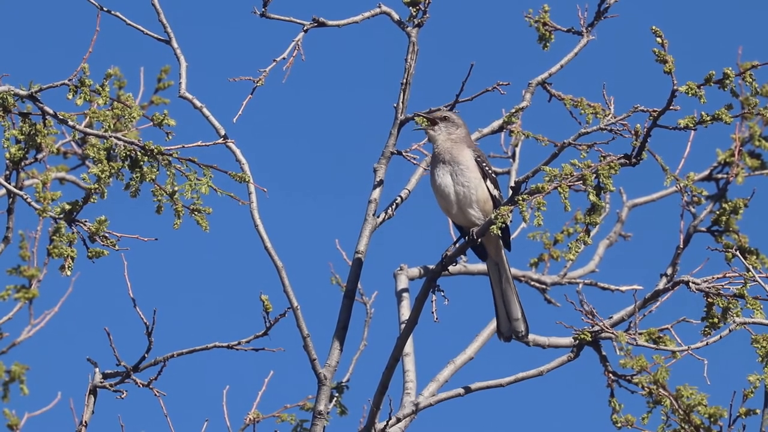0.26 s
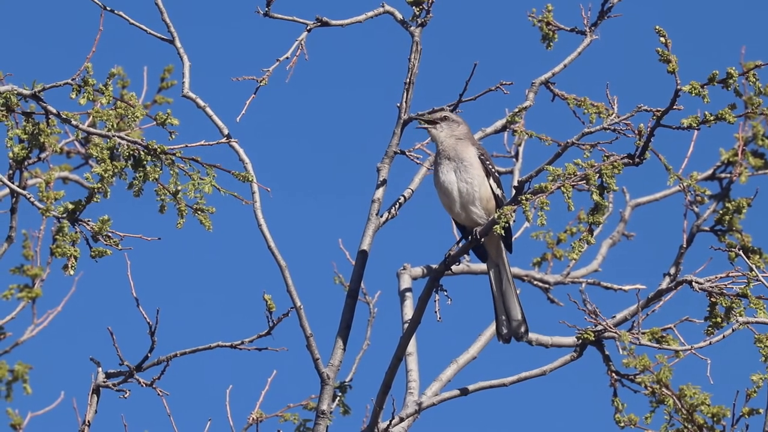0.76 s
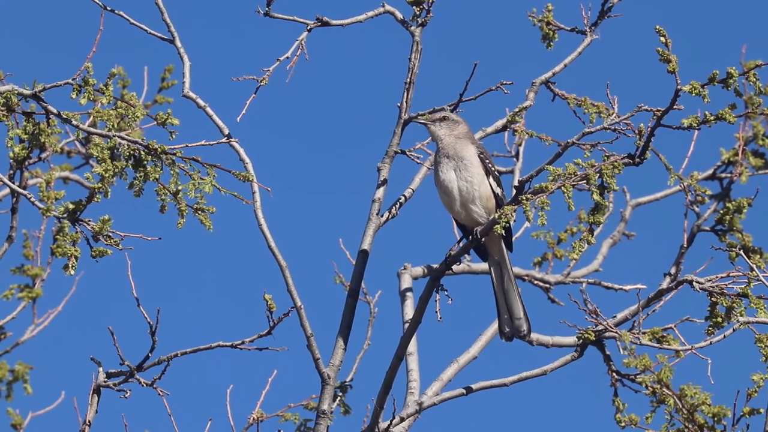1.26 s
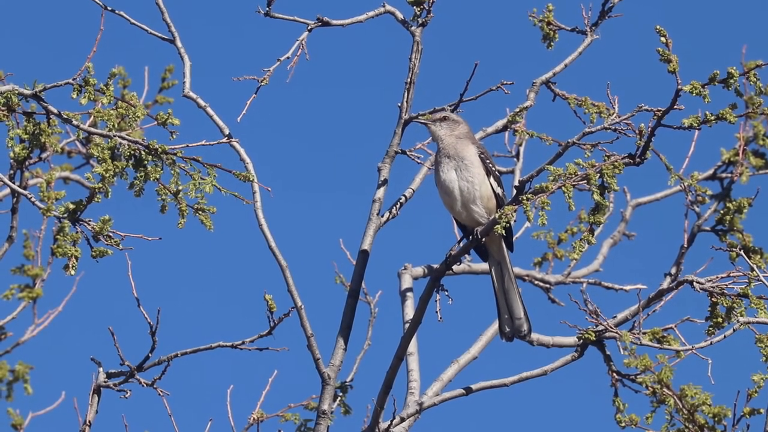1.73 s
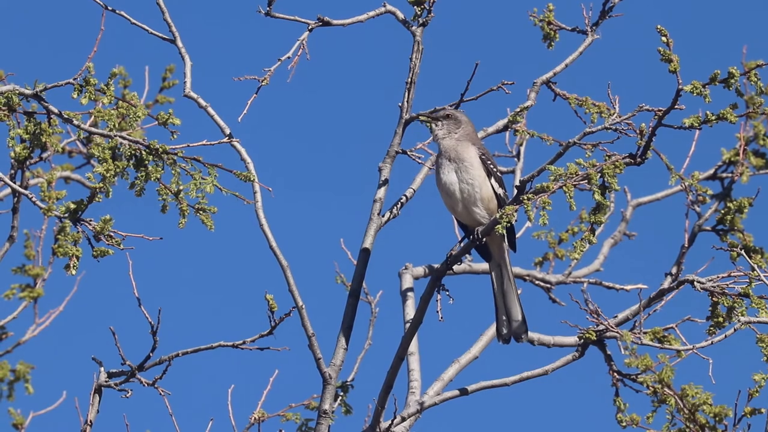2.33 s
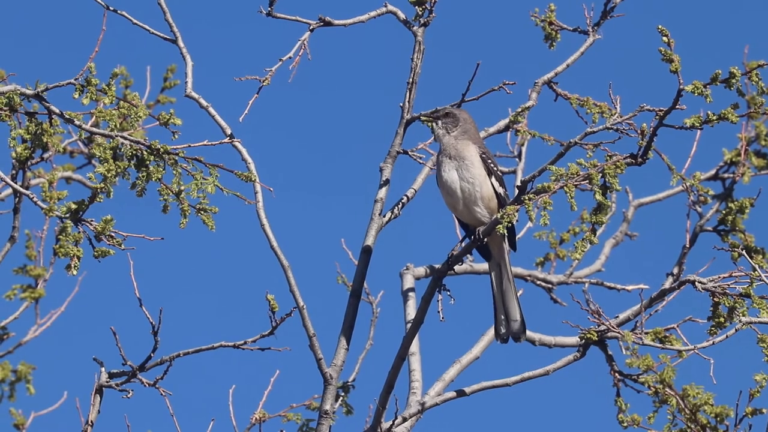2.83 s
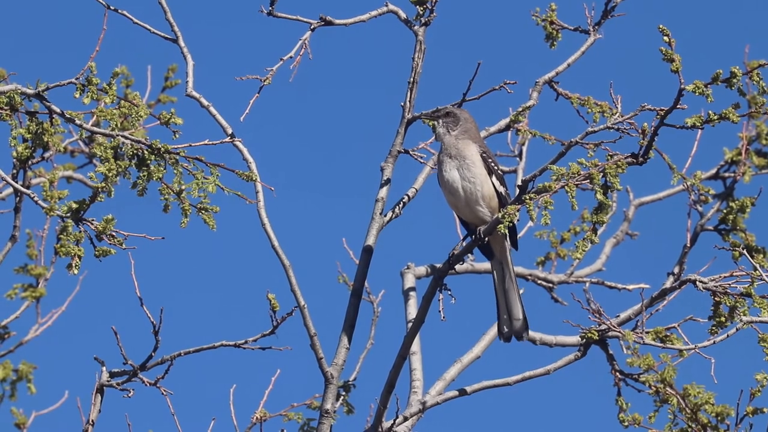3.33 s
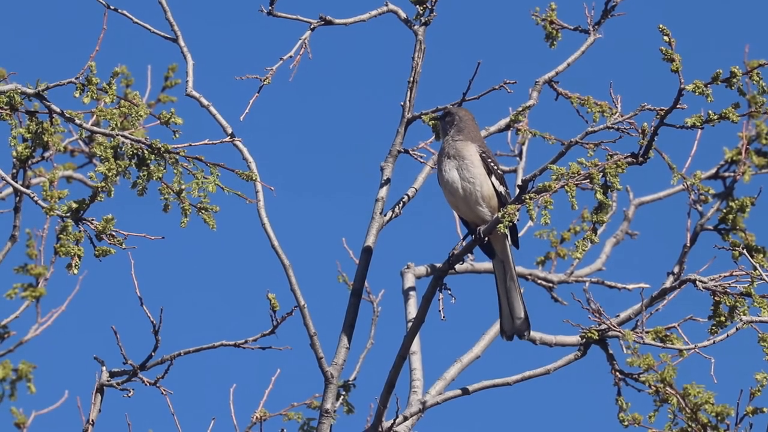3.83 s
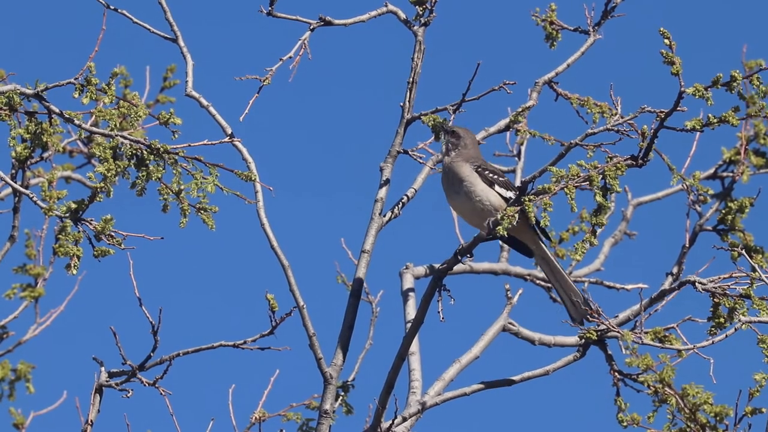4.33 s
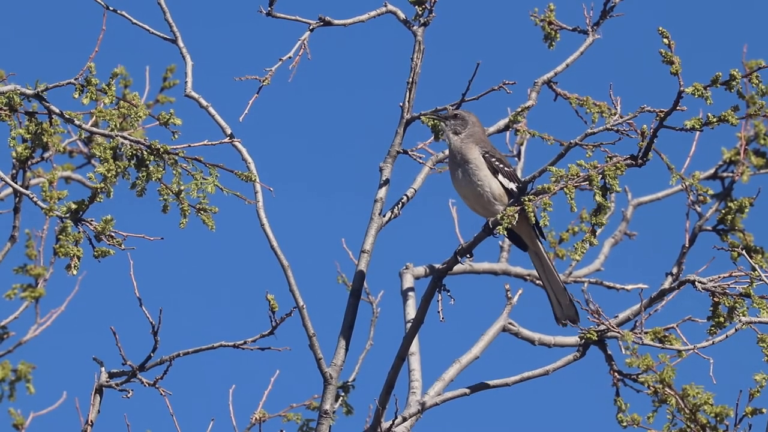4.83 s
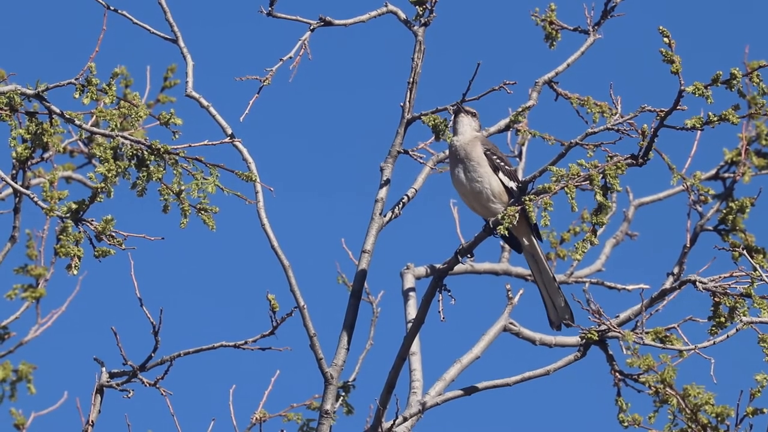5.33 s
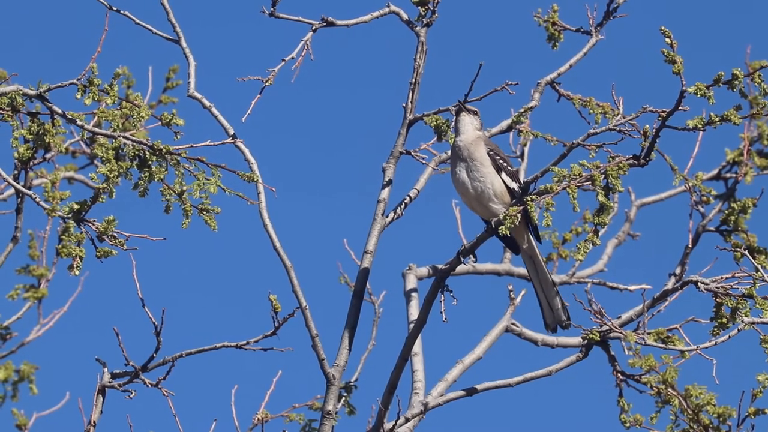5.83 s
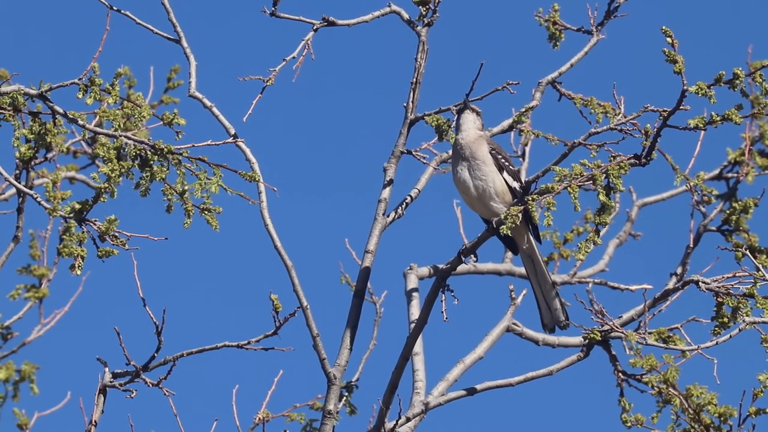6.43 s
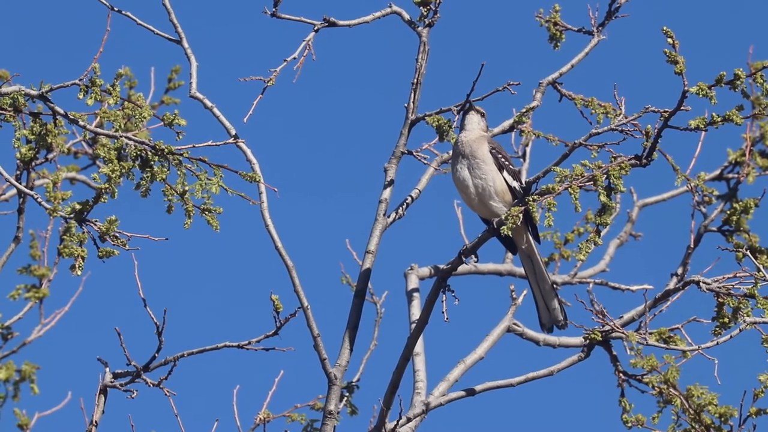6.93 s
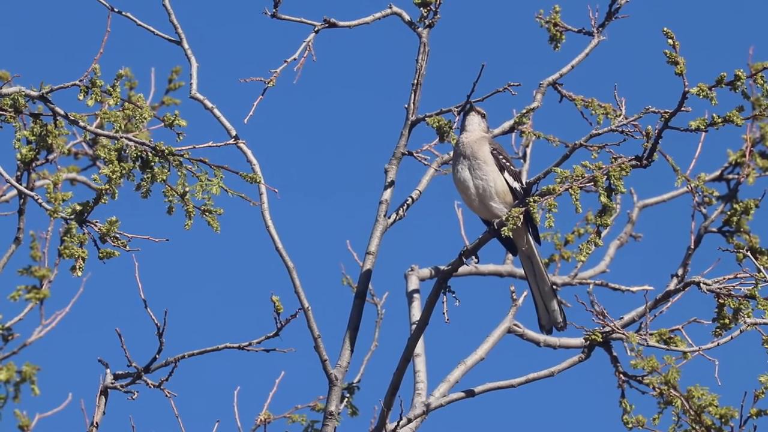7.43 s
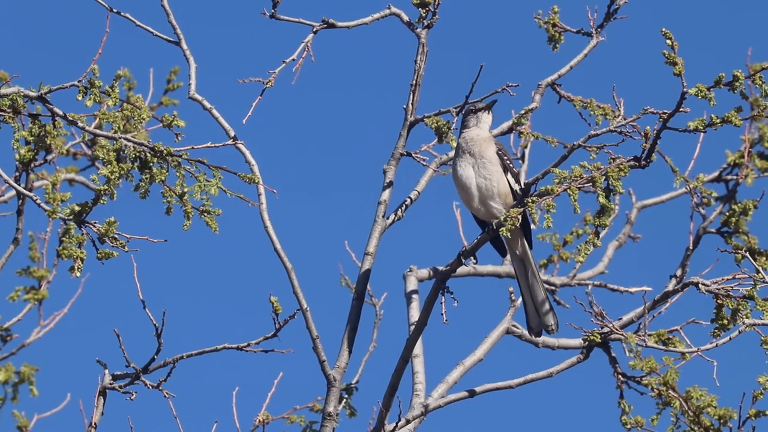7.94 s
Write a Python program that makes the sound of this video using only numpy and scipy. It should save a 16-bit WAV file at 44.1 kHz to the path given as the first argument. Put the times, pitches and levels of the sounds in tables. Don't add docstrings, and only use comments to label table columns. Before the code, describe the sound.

A mockingbird sings from a bare treetop in open country. A low rasp and quick leaping chirps come first, then a pause, plunging whistles and groups of snapping notes, a run of rising slides, a croak into two fast trills, another pause, then whistle and buzz pairs. Faint rocky echo, distant birds and hum. Song is in the left channel only; the right holds only hiss.

```python
import sys
import numpy as np
from scipy import signal
from scipy.fft import rfft, irfft
from scipy.io import wavfile
from scipy.ndimage import uniform_filter1d

SR = 44100
rng = np.random.default_rng(int(sys.argv[2]) if len(sys.argv) > 2 else 0)


def gain_from_db(level_db):
    decades = np.asarray(level_db, float) / 20
    return 10 ** decades


def master(y):
    cut = np.clip(np.atleast_2d(y).T, -1, 1)
    pcm = np.round(cut * 32767)
    wavfile.write(sys.argv[1], SR, pcm.astype(np.int16))


N = 360738

# [t/s, f/Hz, level/dB]
WHISTLES = [
    [(2.026, 2300, -51), (2.033, 2850, -35), (2.039, 3210, -26.5), (2.044, 3170, -28.5), (2.047, 3200, -40)],
    [(5.971, 2216, -42), (5.987, 2156, -26.5), (5.997, 2134, -23), (6.013, 2174, -23), (6.022, 2123, -28),
     (6.03, 2155, -49), (6.048, 2170, -52)],
    [(6.241, 2295, -45), (6.254, 2350, -29.5), (6.27, 2120, -26), (6.284, 2053, -24.5),
     (6.2875, 2124, -24.5), (6.29, 2380, -38), (6.294, 2180, -39), (6.297, 1850, -52)],
    [(7.67, 2660, -46), (7.682, 2294, -27.5), (7.692, 1470, -46.5)],
    [(7.699, 2183, -37), (7.712, 2563, -29), (7.733, 2817, -28.5), (7.77, 3020, -27.5), (7.792, 2035, -26),
     (7.818, 2263, -32.5), (7.85, 2275, -33.5), (7.908, 2260, -34), (7.937, 2440, -49)],
    [(8.142, 2190, -53), (8.154, 2155, -34), (8.166, 1900, -31.5), (8.18, 1950, -34)],
]
# [t/s, f/Hz, level/dB]
DIPS = [
    [(2.0555, 4050, -44), (2.058, 3370, -27), (2.0605, 3060, -23.5), (2.066, 2690, -32),
     (2.075, 2610, -30.5), (2.085, 2750, -34), (2.096, 2870, -29.5), (2.129, 3036, -29), (2.138, 3000, -44)],
    [(2.1455, 3830, -42), (2.148, 3150, -25.5), (2.155, 2970, -24.5), (2.159, 2770, -29),
     (2.168, 2630, -32.5), (2.187, 2580, -37), (2.201, 3020, -28.5), (2.211, 2985, -33), (2.218, 2870, -46)],
    [(2.223, 4250, -49), (2.226, 3630, -28), (2.23, 3030, -21.5), (2.235, 2800, -31), (2.242, 2670, -34),
     (2.252, 2553, -34), (2.271, 2525, -39), (2.277, 2410, -42), (2.293, 2280, -51)],
]
# [share of length, share of pitch span, level under top/dB]
HOOK = [(0, 0, -7.5), (.22, 0.4, -1), (.56, 0.87, -2.5), (.8, 0.79, -9), (1, 0.51, -6)]
ARCH = [(0, 0, -10), (.2, 0.415, -1.5), (.47, 0.932, 5.5), (.72, 0.766, 3), (1, 0.082, -6)]
LEAP = [(0, 0.22, -24), (.1, 0, -16.5), (.38, 0.4, -12), (.6, 0.72, -1), (.76, .78, -2), (.9, 0.92, -4),
        (1, 1, -13)]
LOOP = [(0, .86, -19), (.07, 0.66, -5.5), (.15, .55, 1.5), (.25, .3, -1.5), (.4, .02, -14), (.74, .08, -15),
        (.82, .434, 1), (.87, 1, -20), (.91, 0.64, -2), (1, 0.16, -16)]
PLUNGE = [(.03, 1, -18), (.1, .56, -4), (.16, 0.45, 0.5), (.25, .26, -3), (.36, .08, -13),
          (.5, 0.032, -12.5), (.74, .08, -14.5), (.82, 0.436, 0.5), (.87, 1, -20), (.91, 0.56, -5),
          (1, 0.23, -18)]
CLIMB = [(0, .03, -19), (.18, 0.49, -9.5), (.3, .69, -0.5), (.55, .8, 0.5), (.635, .86, -9),
         (.68, .9, -3.5), (.73, .94, -12.5), (.8, .97, -1.5), (1, 1, -27)]
# [start t/s, length/s, low f/Hz, high f/Hz, top level/dB]
ARCHES = [
    (0.176, 0.032, 1493, 2207, -34),
    (0.219, 0.034, 1384, 1857, -35.5),
]
LEAPS = [
    (0.339, .033, 1530, 4020, -29),
    (.627, 0.032, 1366, 4190, -26),
]
LOOPS = [
    (.373, .069, 2230, 4750, -24.5),
    (.658, .071, 2300, 4800, -23.5),
]
CLIMBS = [
    (.47, 0.069, 1470, 4415, -26.5),
    (0.766, 0.058, 1470, 4353, -25.5),
]
HUMPS = [
    (3.867, 0.038, 1504, 1980, -42.5),
    (3.906, 0.03, 1530, 2010, -40.5),
    (3.947, 0.03, 1485, 1923, -42.5),
]
# [start t/s, snap t/s, start f/Hz, held f/Hz, top level/dB]
FLICKS = [(2.364, 2.391, 986, 1325, -34.5), (2.413, 2.443, 1308, 1345, -29.5),
          (2.465, 2.501, 1292, 1339, -30.5), (2.522, 2.56, 1275, 1330, -31.5),
          (2.583, 2.623, 1165, 1254, -34), (2.858, 2.882, 960, 1290, -40),
          (2.904, 2.936, 1270, 1340, -34.5), (2.961, 2.994, 1260, 1376, -35.5),
          (3.022, 3.061, 1244, 1437, -38), (3.387, 3.41, 1160, 1425, -45),
          (3.432, 3.463, 1270, 1380, -40.5), (3.486, 3.523, 1228, 1396, -38.5),
          (3.555, 3.59, 1234, 1333, -38)]
# [start t/s, end t/s, knee f/Hz, top f/Hz, top level/dB]
RISES = [
    (4.066, 4.118, 2460, 2970, -28.5),
    (4.138, 4.197, 2425, 2975, -27.5),
    (4.218, 4.288, 2330, 2920, -27),
    (4.32, 4.384, 2296, 2780, -27.5),
    (4.414, 4.482, 2343, 2800, -29),
    (4.57, 4.627, 2237, 2554, -27),
    (4.646, 4.71, 2220, 2725, -27.5),
    (4.74, 4.798, 2274, 2920, -28),
]
# [t/s, f/Hz, level/dB]
TRILL_ENDS = [
    [(5.032, 2340, -34), (5.038, 2510, -39), (5.049, 2600, -52), (5.055, 2650, -36.5), (5.073, 2714, -30.5),
     (5.077, 2620, -41), (5.086, 2970, -30), (5.103, 2620, -31), (5.1055, 2450, -42)],
    [(5.114, 3250, -48), (5.119, 2980, -33), (5.129, 2870, -32.5), (5.131, 2200, -43), (5.138, 1970, -45)],
    [(5.512, 2180, -41), (5.517, 2680, -45), (5.5205, 2740, -31.5), (5.5295, 2685, -32.5),
     (5.5315, 2200, -41)],
    [(5.826, 2000, -33), (5.83, 2530, -33), (5.837, 2360, -40), (5.846, 2410, -68)],
]
# [t from its start/s, f/Hz, level under top/dB]
CHIP = [(0, 2380, -5), (.0015, 2420, 3.5), (.0028, 2680, 3), (.0055, 2745, -0.5), (.0095, 2900, 0.5),
        (.012, 2530, -1.5), (.0131, 2380, 0), (.0152, 1946, 4), (.0175, 1750, -9)]
# [t/s, peak level/dB, factor on pitch, extra crest f/Hz, falling stroke level/dB]
CHIPS = [(5.1433, -33.5, 1.106, 0, -2), (5.169, -34.5, 1.03, 148, -2.5), (5.1946, -33, 1.01, 64, -13),
         (5.22, -33, 1.007, 30, -7.5), (5.247, -32, 0.95, 94, -24), (5.5463, -31, 1.03, 66, -14),
         (5.5732, -31, 1.017, 32, -18), (5.6, -31, 1.007, 330, -8.5), (5.6289, -31, 1.016, 90, -8.5),
         (5.6569, -31.5, 1, 57, -10), (5.687, -32.5, .99, 40, -7.5), (5.7135, -31.5, 1, 18, -8),
         (5.744, -32, 1.013, 77, -6.5), (5.774, -32, 1, 55, -7.5), (5.8019, -33, 1.02, 40, -9.5)]
# [start t/s, end t/s, start f/Hz, end f/Hz, level/dB]
FAINT = [
    (1.96, 2.033, 2530, 2480, -62),
    (4.018, 4.08, 3200, 2810, -62.5),
    (4.058, 4.112, 3000, 4740, -66),
    (7.687, 7.698, 3980, 2450, -47),
    (8.168, 8.221, 2630, 2770, -37),
]
# [t/s, f/Hz, level/dB, pitch swing 0-1, level swing 0-1]
RASP = [(.024, 2030, -51, 0.31, 0.4), (.031, 2042, -39, 0.35, 0.14), (.06, 2105, -40.5, 0.22, 0),
        (.11, 2048, -42, 0.25, 0.1), (.124, 1920, -51, 0.23, .3)]
# [t/s, f/Hz, level/dB, pitch swing 0-1, level swing 0-1]
BUZZES = [
    [(6.032, 2936, -39, 0.028, .2), (6.048, 3020, -37.5, .035, .25), (6.066, 3097, -34.5, 0.028, 0.47),
     (6.09, 2970, -35, 0.066, .65), (6.12, 2870, -34.5, 0.085, .6), (6.142, 2810, -35.5, 0.084, .55),
     (6.155, 2770, -37.5, 0.13, .15), (6.18, 2780, -43, 0.11, .6), (6.212, 2790, -53, .085, 0.64)],
    [(6.297, 2850, -41, .05, .3), (6.303, 2950, -40, 0.044, .3), (6.316, 3037, -36, .03, .2),
     (6.327, 2984, -33.5, .012, .05), (6.34, 3100, -30.5, 0.033, .1), (6.376, 3100, -29.5, 0.041, .1),
     (6.382, 2940, -32.5, .06, 0.18), (6.399, 2720, -36, .06, .2), (6.407, 2320, -61, 0.093, .2)],
]
# [first f/Hz, last f/Hz, lopsidedness/radians, unevenness 0-1, pitch shake 0-1]
FLUTTERS = [
    (122, 134, .25, .04, .008),
    (226, 198, .2, .17, .014),
    (236, 200, .1, .12, .009),
]
# [t/s, pulse f/Hz, level/dB, low throat f/Hz, high throat level/dB]
CROAK = [(4.961, 189, -56, 1520, 26), (4.969, 189.2, -41.5, 1550, 20), (4.982, 235, -36.5, 1570, 13),
         (4.992, 301, -36, 1590, 14), (5.0, 267.7, -36.5, 1610, 2), (5.02, 280, -37.5, 1690, -10),
         (5.035, 296, -41, 1760, 1), (5.05, 314, -40.5, 1920, -16), (5.072, 357, -53, 2100, -22)]
# [start t/s, end t/s]
PAIRING_S = (4.99, 5.004)
# [delay t/s, level/dB]
BOUNCES = [
    (.0046, -17),
    (0.0101, -19.5),
    (0.027, -26),
]
# [t/s, extra scatter level/dB]
FACING = [
    (.3, 4),
    (1.5, -2.5),
    (2.3, 3),
    (3.6, 8),
    (4.4, 3.5),
    (5.1, 1.5),
    (8.1, -1),
]
# [start t/s, length/s, centre f/Hz, width f/Hz, level/dB]
FAR = [
    (1.43, .12, 3000, 250, -69),
    (1.89, .07, 3320, 60, -67),
    (6.85, 0.23, 3020, 220, -64.5),
    (7.05, .18, 3050, 300, -67),
    (7.18, .16, 2220, 40, -70),
    (7.57, .11, 3150, 120, -68),
]
# [f/Hz, width f/Hz, level/dB]
HUM = [
    (160, 2.3, -77.5),
    (342.4, 104, -76),
    (751, 35, -75),
]
# [t/s, level/dB]
WIND = [
    (0.0, -53.5),
    (0.59, -72),
    (6.168, -79),
    (6.31, -68),
    (6.649, -77),
    (8.07, -76),
    (8.18, -65),
]
# [f/Hz, level per Hz/dB]
HISS = [(16, -24), (46, 0), (71, -9), (190, -10), (755, -13), (1660, -14), (3200, -15.5), (13000, -16.5)]
# [f/Hz, level/dB]
LEFT_OVER_RIGHT = [(60, 4.5), (230, -1), (900, -0.5), (3490, -0.5), (13500, -1.5)]


def evened(x):
    return x / np.sqrt(np.mean(x ** 2) + 1e-20)


def read(points, hz):
    f, value = np.transpose(points)
    return np.interp(np.log(hz + 1), np.log(f + 1), value)


def unroll(rows):
    s, *columns = np.transpose(rows)
    t = np.arange(s[0], max(s[-1], s[0] + 0.004), 1 / SR)
    return [uniform_filter1d(np.interp(t, s, c), size=50) for c in columns]


def drift(shape, size):
    return evened(uniform_filter1d(rng.standard_normal(shape), size=size))


def add(mix, s, sound):
    edges = signal.windows.tukey(len(sound), min(130 / len(sound), 1))
    part = mix[round(s * SR):][:len(sound)]
    part += (sound * edges)[:len(part)]


def band(hz, width_hz):
    r = np.exp(-np.pi * width_hz / SR)
    noise = rng.standard_normal(N) + 1j * rng.standard_normal(N)
    slow = signal.lfilter([1 - r], [1, -r], noise)
    return evened((slow * np.exp(2j * np.pi * hz * np.arange(N) / SR)).real)


def syrinx(hz, overtones_db, throat_hz, width_hz, shut=0, held=1):
    k = np.arange(1, len(overtones_db) + 1)[:, None]
    off = (k * hz - throat_hz) / width_hz
    throat = 1 / (1 + off ** 2 + (np.maximum(off, 0) * shut) ** 4) ** 2
    beak = 0.015 / (1 + ((k * hz - 8200) / 1300) ** 2)
    share = gain_from_db(overtones_db)[:, None] * (0.0026 + throat + beak)
    power = uniform_filter1d((share ** 2).sum(0), size=held) / 2
    tremor = 1 + 0.024 * drift(len(hz), 60)
    wander = 1 + (0.001 + 0.003 * shut) * drift(len(hz) + 400, 400)[200:-200]
    turns = k * np.cumsum(hz * wander) / SR + rng.random(k.shape)
    return tremor * (share * np.cos(2 * np.pi * turns)).sum(0) / np.sqrt(power)


def trace(shape, start, length, low_hz, high_hz, db):
    return np.multiply(shape, [length, high_hz - low_hz, 1]) + [start, low_hz, db]


def flick(start, snap, start_hz, held_hz, db):
    climb_hz, climbs = held_hz - start_hz, held_hz > 1.15 * start_hz
    start_db = db - 6.5 - 32 * climb_hz / start_hz
    leap = (0.8 if climbs else 1) * np.clip((db + 49) / 8, 0.6, 1)
    hook, crest = (1, 0.62) if climbs else (1.03, 1.15)
    snap_db = db + 1.0 + 0.7 * (-32 - db)
    return [(start, hook * start_hz, start_db - 10),
            (start + 0.002, hook * start_hz, start_db),
            (start + 0.32 * (snap - start), start_hz + 0.27 * climbs * climb_hz, start_db + 0.5 * (db - start_db)),
            (snap - 0.011, start_hz + crest * climb_hz, db - 0.8),
            (snap - 0.003, 0.962 * held_hz, db),
            (snap, 1.14 * held_hz, db - 0.5),
            (snap + 0.0013, 1.236 * held_hz, db - 13.0),
            (snap + 0.00335, (1 + 0.61 * leap) * held_hz, snap_db),
            (snap + 0.006, (1 + 1.07 * leap) * held_hz, snap_db - 8),
            (snap + 0.0075, (1 + 1.25 * leap) * held_hz, db - 18)]


def rise(start, end, knee_hz, top_hz, db):
    from_hz, from_db = 1550, -22
    knee = end - 0.01163
    length, span_hz = knee - start, knee_hz - from_hz
    sag = min(0.03 + 0.8 * (start - RISES[0][0]), 0.27)
    return [(start, from_hz, db + from_db),
            (start + 0.287 * length, from_hz + sag * span_hz, db + 0.71 * from_db),
            (start + 0.72 * length, from_hz + 0.67 * span_hz, db - 3.5),
            (knee, knee_hz, db),
            (end - 0.004, top_hz - 70, db - 2.0),
            (end, top_hz, db - 11.5)]


def chip(s, db, up, crest_hz, fall_db):
    slow = 0.9 + 0.2 * (s - CHIPS[0][0])
    point = np.arange(len(CHIP))
    rows = np.multiply(CHIP, [slow, up, 1]) + [s - 0.001, 0, db]
    rows = rows + np.outer(point == 4, [0, crest_hz, -crest_hz / 80])
    return rows + np.outer(point >= 6, [0, 0, fall_db])


def faint(start, end, start_hz, end_hz, db):
    return [(start, start_hz, db - 23),
            (start + 0.18 * (end - start), start_hz + 0.31 * (end_hz - start_hz), db),
            (end, end_hz, db - 0.5)]


def whistles(bird):
    flicks = [flick(*row) for row in FLICKS]
    leaps = [trace(LEAP, *row) for row in LEAPS]
    climbs = [trace(CLIMB, *row) for row in CLIMBS]
    humps = [trace(ARCH, *row) for row in HUMPS]
    rises = [rise(*row) for row in RISES]
    chips = [chip(*row) for row in CHIPS]
    # (notes, overtone levels/dB, throat f/Hz, throat width f/Hz, beak shut 0-2)
    phrases = [([trace(HOOK, *ARCHES[0])], [6.5, 3.5, 0, 13, 10], 3600, 1800, 0),
               ([trace(ARCH, *ARCHES[1])], [0.5, 6.0, -15, 3, 11.0], 3600, 1800, 0),
               (leaps, [6.5, 11.5, 14, 0], 3100, 1600, 0),
               ([trace(LOOP, *LOOPS[0])], [5.0, 6.5, 10, -3, -8], 3100, 1600, 0),
               ([trace(PLUNGE, *LOOPS[1])], [2.7, 6.3, 10.7, 12, 5], 3100, 1600, 0),
               (climbs[:1], [2.1, 5.8, 12, 8], 3100, 1600, 0),
               (climbs[1:], [2.6, 6.9, 3, 4], 3100, 1600, 0),
               (DIPS + WHISTLES[:1], [0, -15, -11], 3000, 3500, 0),
               (flicks[:1] + flicks[4:5], [4.5, 5.5, -8], 2650, 1000, 1.05),
               (flicks[1:4], [3, 5.5, 5], 2650, 1000, 1.05),
               (flicks[5:9], [3, 0.4, -4], 2550, 1000, 1.6),
               (flicks[9:10], [6, -2], 2100, 1000, 0.6),
               (flicks[10:], [9, 0, -10], 2550, 1000, 1.6),
               (humps + rises, [0, -36], 2500, 3000, 0),
               (WHISTLES[1:3], [0, -37, -30], 2500, 3500, 0),
               (WHISTLES[3:], [0, -26, -30], 2300, 2300, 0),
               (TRILL_ENDS + chips, [0, -24], 2500, 3000, 0),
               ([faint(*row) for row in FAINT], [0], 3000, 3000, 2)]
    for notes, overtones_db, *throat in phrases:
        for rows in notes:
            hz, db = unroll(rows)
            add(bird, rows[0][0], gain_from_db(db) * syrinx(hz, overtones_db, *throat))


def buzzes(bird):
    # (curve, overtone levels/dB, throat f/Hz, throat width f/Hz, starting phase/turns)
    voices = [(RASP, [1.2, 4.0, -3, 11.5, 13], 3300, 1700, 0.33)]
    voices += [(rows, [0, -30], 3000, 3000, 0.3) for rows in BUZZES]
    for voice, flutter in zip(voices, FLUTTERS):
        rows, overtones_db, throat_hz, width_hz, start = voice
        first_hz, last_hz, skew, jitter, shake = flutter
        hz, db, swing, throb = unroll(rows)
        uneven, shaky, gritty = drift((3, len(hz)), 90)
        flutter_hz = np.linspace(first_hz, last_hz, len(hz))
        turn = 2 * np.pi * (np.cumsum(flutter_hz * (1 + jitter * uneven)) / SR + start)
        swung = swing * (1 + jitter * gritty) * np.cos(turn + skew * np.cos(turn))
        pitch_hz = hz * (1 + swung + shake * shaky)
        tone = syrinx(pitch_hz, overtones_db, throat_hz, width_hz, held=1500)
        beats = 1 + np.clip(throb, 0, 1) * np.sin(turn - 0.3)
        beats *= 1 + 2 * jitter * np.sin(turn / 2)
        add(bird, rows[0][0], gain_from_db(db + 0.45 * gritty) * tone * beats)


def croak(bird):
    hz, db, low_hz, high_db = unroll(CROAK)
    k = np.arange(1, 24)[:, None]
    pairing = np.interp(CROAK[0][0] + np.arange(len(hz)) / SR, PAIRING_S, [0, 1])
    shaky, gritty = drift((2, len(hz)), 90)
    # (resonance f/Hz, width f/Hz, level/dB)
    rings = [(low_hz, 230, 0 * hz),
             (2250, 280, high_db - 9 + 12 * pairing),
             (2750, 260, high_db - 3.0),
             (2750 + 1.36 * hz, 300, high_db)]
    share = sum(gain_from_db(lift_db) / (1 + 1j * (k * hz - f) / width_hz) ** 4 for f, width_hz, lift_db in rings)
    share = share * gain_from_db(-9 * pairing * (k % 2))
    share = share / (1 + (1300 / (k * hz)) ** 12)
    fray = drift((2, *share.shape), 120)
    share = share * (1 + 0.3 * (fray[0] + 1j * fray[1]) * np.minimum(k / 10, 1) ** 2)
    phase = 2 * np.pi * k * np.cumsum(hz + 5.0 * shaky) / SR
    tone = (share * np.exp(1j * phase)).sum(0).real
    loudness = np.sqrt((abs(share) ** 2).sum(0) / 2)
    add(bird, CROAK[0][0], gain_from_db(db + 0.9 * gritty) * tone / loudness)


def surroundings(x):
    t = np.arange(SR) / SR
    at = np.arange(40, len(t) - 30, 30)
    taps = np.zeros(len(t))
    taps[at + rng.integers(0, 30, len(at))] = rng.choice([-1.0, 1.0], len(at))
    branches = gain_from_db(-60 * t / 0.073) * np.minimum(t / 0.002, 1)
    ground = np.exp(-((t - 0.066) / 0.0086) ** 2)
    rock = gain_from_db(-60 * t / 2.0)
    tail = np.zeros(len(t))
    for db, shape in [(-15, branches), (-35.5, ground), (-31, rock)]:
        tail += gain_from_db(db) * taps * shape / np.linalg.norm(taps * shape)
    for s, db in BOUNCES:
        tail[round(s * SR)] += gain_from_db(db)
    leaves = signal.butter(1, 2200, "high", fs=SR, output="sos")
    scattered = signal.sosfilt(leaves, x)
    scattered *= gain_from_db(np.interp(np.arange(N) / SR, *np.transpose(FACING)))
    return signal.fftconvolve(scattered, tail)[:N]


def far_birds():
    out = np.zeros(N)
    for start, length, hz, width_hz, db in FAR:
        swell = signal.windows.tukey(round(length * SR), 0.5)
        add(out, start, gain_from_db(db) * swell * band(hz, width_hz)[:len(swell)])
    return out


def hum():
    return sum(gain_from_db(db) * band(hz, width_hz) for hz, width_hz, db in HUM)


def wind():
    s, db = np.transpose(WIND)
    rumble = band(43, 6.6) + 1.8 * band(27, 5.7) + 0.2 * band(60, 40)
    rumble = signal.sosfilt(signal.butter(2, 110, fs=SR, output="sos"), rumble)
    return gain_from_db(np.interp(np.arange(N) / SR, s, db) + 4.5) * evened(rumble)


def hiss():
    hz = np.fft.rfftfreq(N, 1 / SR)
    z = rfft(rng.standard_normal((2, N))) * gain_from_db(read(HISS, hz))
    z *= gain_from_db(np.outer([0.5, -0.5], read(LEFT_OVER_RIGHT, hz)))
    return gain_from_db(-57.5) * evened(irfft(z, N))


def scene():
    bird = np.zeros(N)
    whistles(bird)
    buzzes(bird)
    croak(bird)
    air = bird + surroundings(bird) + far_birds() + hum() + wind()
    return hiss() + np.array([air, 0 * air])


def top_cut(x):
    return signal.sosfilt(signal.butter(12, 14120, fs=SR, output="sos"), x)


def record(dry):
    edge = signal.firwin(511, 13240, window=("kaiser", 9), fs=SR)
    mix = signal.oaconvolve(dry, edge[None], "same")
    return top_cut(mix)


dry = scene()
out = record(dry)
master(out)
```